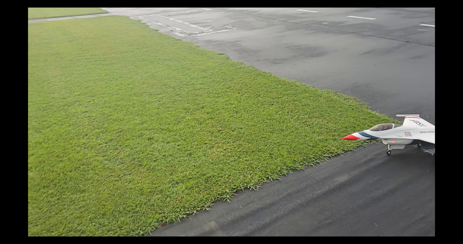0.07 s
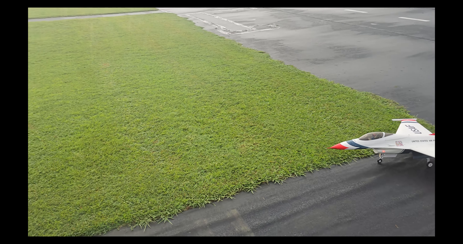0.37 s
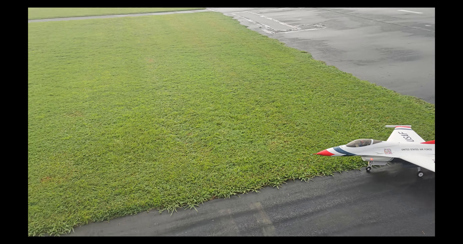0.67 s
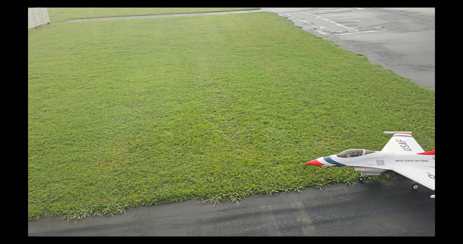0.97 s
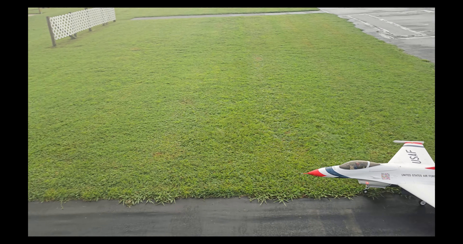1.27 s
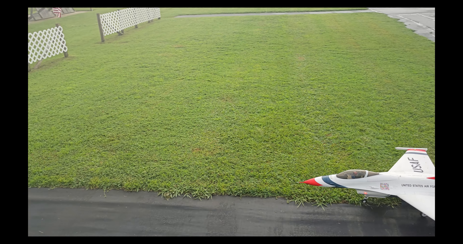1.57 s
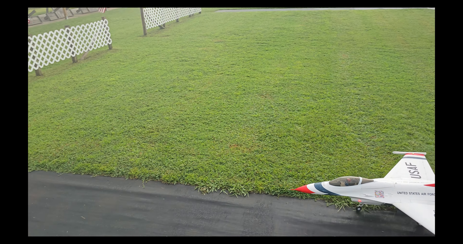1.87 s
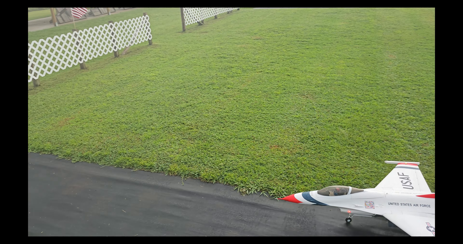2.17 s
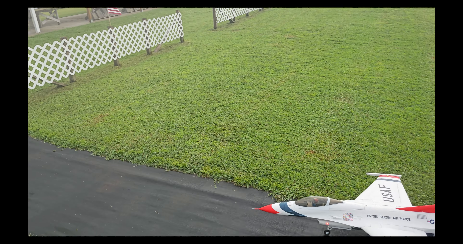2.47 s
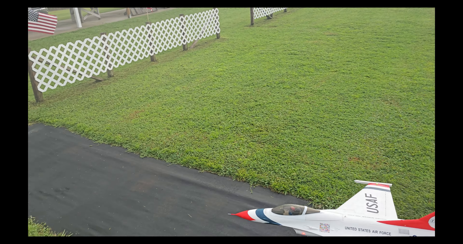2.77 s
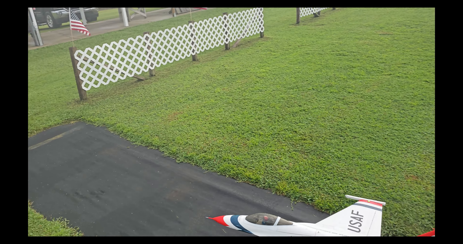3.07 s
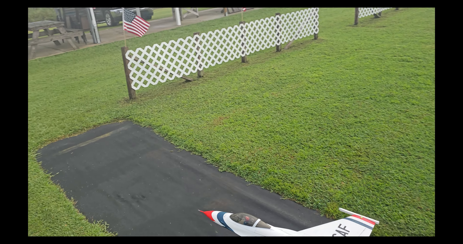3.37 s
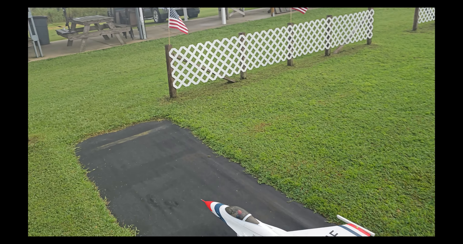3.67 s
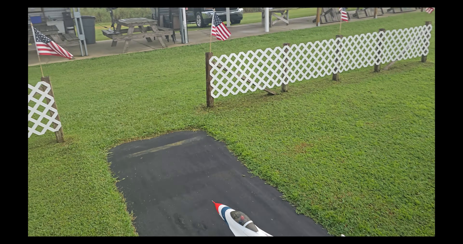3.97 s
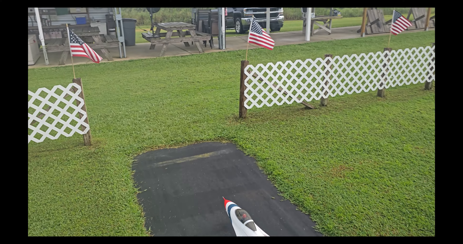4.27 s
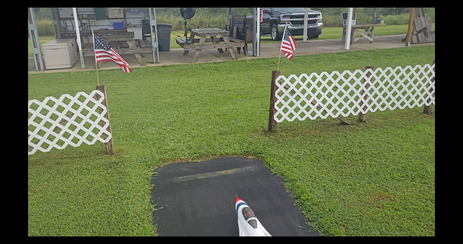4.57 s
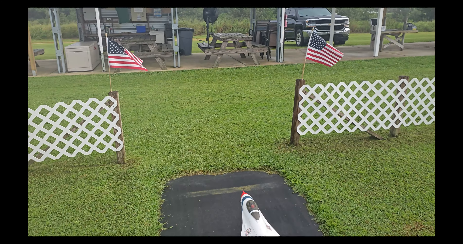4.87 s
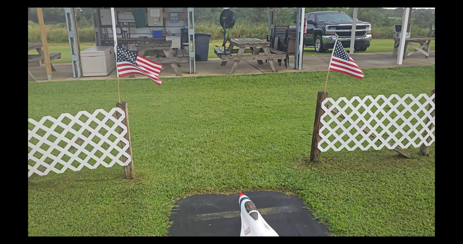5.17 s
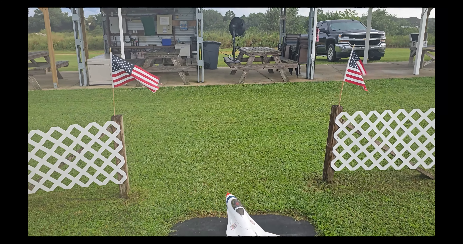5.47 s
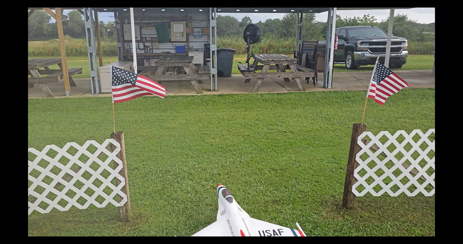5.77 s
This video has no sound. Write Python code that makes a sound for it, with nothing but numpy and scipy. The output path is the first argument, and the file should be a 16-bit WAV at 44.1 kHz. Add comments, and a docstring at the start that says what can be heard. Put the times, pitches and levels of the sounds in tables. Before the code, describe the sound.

Outdoors, over a faint rumble and even hiss, the electric fan of a model jet whines and roars, its pitch swelling and sinking with the throttle. Two quick wheel bumps come near the start, and the rushing air changes tone as the jet turns. The fan winds nearly to a stop, chirps back to life, dips again and ends with a sharp, high rev that drops off.

```python
"""Wet pavement: a model jet with a twelve-blade electric ducted fan taxis in throttle bursts.
The blades whistle through the duct, the motor sings in its housing, the turbulent exhaust roars.
The fan almost stops and restarts with a motor chirp; a thin squeal marks the last spool-up.
The rush changes colour as the jet turns tail-on, nose-on, side-on. Wheels bump over joints.
Behind it lie a low outdoor rumble and a soft, steady hiss."""
import sys
import numpy as np
from scipy import signal
from scipy.fft import rfft, irfft, next_fast_len
from scipy.io import wavfile

SR = 44100
rng = np.random.default_rng(int(sys.argv[2]) if len(sys.argv) > 2 else 0)


def transcribe(u):
    """Save the signal u as a 16-bit wav file named by the first command-line argument.

    u: samples, shape (n,) or (channels, n), limited to [-1, 1]; the rate is SR.
    q: integer samples, one column per channel.
    """
    v = np.clip(np.atleast_2d(u).T, -1, 1)
    q = np.round(v * 32767).astype(np.int16)
    wavfile.write(sys.argv[1], SR, q)


N = 256220
TIME = np.arange(N) / SR
CRUISE_HZ = 250  # shaft speed
TAIL, QUARTER, NOSE, SIDE = range(4)  # tail-on, rear quarter, nose-on, side-on

# turn of the jet: t/s, heading/(TAIL..SIDE)
HEADING = [(0, 0), (.9, 0), (1.5, 0.53), (2.0, 1.17), (2.4, 1), (3.55, 1.5), (3.9, 2), (4.9, 2), (5.3, 3),
           (5.81, 3)]
# throttle bursts: t/s, shaft speed/Hz
SHAFT = [(0.0, 266), (0.196, 231.5), (0.356, 167.7), (0.563, 211.9), (0.656, 321.7), (0.696, 339.7),
         (0.851, 332), (0.89, 312.5), (1.056, 212), (1.178, 204.8), (1.271, 224.1), (1.482, 277.3),
         (1.575, 327.8), (1.816, 378), (1.856, 377), (2.075, 287.9), (2.306, 253), (2.346, 240.3),
         (2.701, 194.4), (2.741, 194.4), (2.978, 245.2), (3.018, 248.2), (3.157, 243), (3.268, 189.6),
         (3.582, 80.4), (3.821, 47.06), (3.865, 41.5), (3.898, 98.3), (4.067, 191.8), (4.107, 221.4),
         (4.168, 233), (4.296, 237.7), (4.612, 233.9), (4.719, 225.7), (5.031, 108.5), (5.095, 103.5),
         (5.134, 154.4), (5.28, 226), (5.359, 345), (5.505, 497.3), (5.553, 486.4), (5.621, 406),
         (5.81, 200.6)]


def shaft_speed():
    """Shaft speed/Hz: rotor inertia rounds the throttle changes, turbulence jitters the pitch."""
    return glide(SHAFT) * (1 + 0.001 * wobble(45) + 0.00155 * wobble(260))


def blades(shaft_hz, shaft_rad):
    """Twelve blades whistle through the duct; uneven inflow shakes the tone and adds a noise skirt."""
    # duct response to the blade tone: f/Hz, level/dB
    duct = [(510, -42.5), (720, -30.5), (870, -47), (1220, -25.5), (1780, -19.5), (2150, -29.5),
            (2390, -24), (2550, -28.5), (2760, -20.5), (2980, -25), (3350, -22), (3750, -19.5),
            (4030, -16.8), (4250, -19), (4400, -23), (4540, -19), (5800, -13)]
    # duct response to its octave, one strong resonance: f/Hz, level/dB
    duct_octave = [(1100, -71), (3690, -45.5), (4770, -46), (4970, -37), (5230, -41), (5560, -31.5),
                   (5690, -27.5), (5900, -38), (8300, -50), (9050, -40.5), (12000, -42)]
    # blade tone envelope, apart from pitch: t/s, level/dB
    envelope = [(.06, -9), (.2, -1.5), (.49, -3), (.62, 5), (.92, 5), (.98, -3), (1.58, 1.7), (2.48, -5),
                (2.6, 1.7), (3.17, 6), (3.44, 0), (3.94, 8.5), (4.07, 1), (4.9, 1), (5.18, 1), (5.31, 9.5),
                (5.48, -5.5), (5.81, -5)]
    blade_hz, blade_rad = 12 * shaft_hz, 12 * shaft_rad
    _, _, _, beam_db, _ = directivity_db()
    tone_db = response_db(duct, blade_hz) + curves(envelope)[0]
    octave_db = response_db(duct_octave, 2 * blade_hz) + beam_db
    flutter = wobble(130) * shaft_hz / 300
    swell_db = 2.4 * duct_ripple(blade_hz, spacing_hz=55)
    whistle = amp(tone_db + swell_db + 0.58 * wobble(32) + 2.0 * flutter) * np.sin(blade_rad)
    octave_swell_db = 2.1 * duct_ripple(2 * blade_hz, spacing_hz=110.5)
    whistle += amp(octave_db + octave_swell_db + 1.2 * flutter) * np.sin(2 * blade_rad)
    # thin third harmonic, from behind at high speed
    third = np.sin(3 * blade_rad) + narrow_band(3 * blade_rad, width_hz=260)
    whistle += amp(-46) * facing(0.85) * (shaft_hz / 375) ** 9 * third
    skirt = amp(tone_db - 8.5) * narrow_band(blade_rad, width_hz=120)
    skirt += amp(octave_db - 8.5) * narrow_band(2 * blade_rad, width_hz=110)
    # slower tip eddies hum just under the tone
    _, rush_db, _ = air_levels_db(shaft_hz)
    behind = np.hypot(facing(TAIL), facing(QUARTER))
    eddy_gain = amp(rush_db - 4.5) * behind * (shaft_hz / 370) ** 4
    eddies = eddy_gain * narrow_band(11.3 * shaft_rad, width_hz=410)
    return np.sqrt(2) * whistle + skirt + eddies


def duct_ripple(hz, spacing_hz):
    """Duct modes and reflections favour some pitches: a gliding tone swells and dips."""
    knots = rng.standard_normal(512)
    return np.interp(hz / spacing_hz, np.arange(len(knots)), np.clip(knots, -2.2, .8))


def motor(shaft_hz, shaft_rad):
    """Motor tones swell through the housing resonance over a rasp; imbalance hums at shaft speed."""
    # motor tones: multiple of shaft speed, level/dB
    orders = [(4, 2.5), (5, -15), (6, -2.5), (8, 3), (16, -7), (20, -7), (24, -4), (32, -17)]
    housing_hz, housing_width_hz = 1540, 680
    song = np.zeros(N)
    for order, db in orders:
        detune = 2 * (order * shaft_hz - housing_hz) / housing_width_hz
        song += amp(db + 2.9 * wobble(30)) / (1 + detune ** 4) * np.sin(order * shaft_rad)
    rasp = amp(-7.5) * noise([(1150, -41), (1420, -3), (1620, 1), (1850, -1), (2200, -28)])
    hum_gain = amp(-30 + 1.2 * wobble(14)) * np.clip((shaft_hz - 200) / 55, 0, 1)
    hum = hum_gain * (1 - 0.64 * facing(TAIL)) * np.sin(shaft_rad)
    return amp(motor_level_db()) * (song + rasp) + hum


def motor_level_db():
    """Level follows torque (cruise = 1): air drag, as speed squared, plus spin-up."""
    spin_up_hz_per_s, min_torque, db_per_doubling = 800, 0.58, 8
    shaft_hz = glide(SHAFT)
    torque = (shaft_hz / CRUISE_HZ) ** 2 + np.gradient(shaft_hz) * SR / spin_up_hz_per_s
    *_, motor_db = directivity_db()
    return motor_db + db_per_doubling * np.log2(np.maximum(torque, min_torque))


def airflow(shaft_hz):
    """Turbulent exhaust roar, rush through the duct resonances, hiss off the blade tips."""
    # exhaust spectra, from behind and from elsewhere: f/Hz, level/dB
    roar_tail = [(60, -40), (130, -25.5), (220, -19.5), (300, -8.5), (400, -3.5), (475, 3), (560, -7.5),
                 (700, -12.5), (900, -19), (1400, -38.5)]
    roar_front = [(60, -32), (130, -17.5), (230, -4), (330, 2), (430, 0), (580, -1), (700, -7.5),
                  (900, -10.5), (1400, -21)]
    # duct rush spectra by heading: f/Hz, level/dB
    rush_tail = [(600, -23.5), (1000, -12), (1350, -11.5), (1650, -9.5), (2000, 0), (2300, -1),
                 (2700, -5.5), (3100, -8.5), (3600, 1), (4300, -2.5), (5100, -16), (5800, -12.5),
                 (7000, -27.5), (9000, -47)]
    rush_quarter = [(600, -40), (950, -11), (1250, -16), (1500, 0), (1700, 1), (1880, 8), (2100, -1),
                    (2500, -5), (3000, -11.5), (3600, -7), (4500, -13), (5250, -9.5), (6300, -20),
                    (9000, -51)]
    rush_nose = [(600, -21), (900, -12), (1200, -5), (1450, -1), (1750, -2.5), (2300, -1.5), (2800, 0),
                 (3700, 1), (4150, -12), (4600, -10), (5700, -9.5), (6300, -18.5), (7500, -24), (9000, -23)]
    rush_side = [(600, -33), (950, -6.5), (1200, 0.5), (1500, 4.5), (1900, -0.5), (2300, -6), (3200, -1),
                 (4000, -6), (4800, -8), (5600, -3), (6300, -13.5), (7500, -19), (9000, -30)]
    # blade-tip spectrum: f/Hz, level/dB
    tip_hiss = [(5000, -11), (7000, 0), (9000, -3), (10300, 3), (11300, -1), (12300, -5.5), (13600, 0),
                (14800, -15), (15600, -7)]
    roar_db, rush_db, hiss_db = air_levels_db(shaft_hz)
    tail, quarter, nose, side = map(facing, (TAIL, QUARTER, NOSE, SIDE))
    roar = np.hypot(tail, quarter) * noise(roar_tail) + np.hypot(nose, side) * noise(roar_front)
    rush = (tail * noise(rush_tail) + quarter * noise(rush_quarter)
            + nose * noise(rush_nose) + side * noise(rush_side))
    dull = filtered(rush, lambda hz: 1 / (1 + (hz / 2700) ** 4))
    rush = dull + (rush - dull) * (shaft_hz / 270) ** 0.8  # faster air is brighter
    gust = wobble(18)
    return (amp(roar_db + 0.53 * gust + 0.97 * wobble(40)) * roar
            + amp(rush_db + 0.59 * gust) * rush
            + amp(hiss_db + 0.66 * gust + 0.87 * wobble(70)) * noise(tip_hiss))


def air_levels_db(shaft_hz):
    """Roar, rush and hiss each grow by their own power of the flow."""
    # airflow envelope, apart from speed and heading: t/s, roar and rush/dB, hiss/dB
    envelope = [(0, 1, 5), (.2, 2.3, 4), (.48, -1.5, -4), (.65, 1, 6), (.95, -1, 6.5), (1.2, -0.9, 1.5),
                (1.6, -1.5, -0.5), (2.1, -1.5, -2.5), (2.62, 1.5, -1), (3.05, 0.7, -0.3),
                (3.45, -0.5, -3.5), (3.79, -2.2, 5), (3.85, -6.5, -6), (3.94, 1.3, -3), (4.75, 3.16, 5),
                (5.02, 1, 1), (5.12, 4.8, 5), (5.32, 5, 6), (5.5, -8, -10), (5.81, -3, -4)]
    draught_hz = 102  # flow floor, as a shaft speed
    doublings = np.log2(np.hypot(shaft_hz, draught_hz) / np.hypot(CRUISE_HZ, draught_hz))
    roar_db, rush_db, hiss_db, _, _ = directivity_db()
    body_db, treble_db = curves(envelope)
    return (roar_db + 12.5 * doublings + body_db,
            rush_db + 13 * doublings + body_db,
            hiss_db + 21.5 * doublings + treble_db)


def directivity_db():
    """Level of each layer as the jet turns."""
    # radiation at cruise, rows TAIL..SIDE: roar/dB, rush/dB, hiss/dB, whistle octave/dB, motor/dB
    radiation = [(-20.5, -23.5, -54, 0, -38.5), (-21, -21, -46, -3.5, -37), (-24, -18, -38.2, 6, -25),
                 (-29, -21, -41.5, -0.5, -41.5)]
    heading, = curves(HEADING)
    return [np.interp(heading, np.arange(len(db)), db) for db in np.transpose(radiation)]


def facing(view):
    """Equal-power crossfade gain for one side of the jet."""
    return np.sqrt(np.clip(1 - abs(curves(HEADING)[0] - view), 0, 1))


def controller_squeal():
    """The speed controller squeals thinly at the start of the last spool-up."""
    # squeal envelope: t/s, level/dB
    envelope = [(5.08, -90), (5.115, -46), (5.2, -42), (5.25, -43), (5.3, -90)]
    return amp(curves(envelope)[0]) * narrow_band(2 * np.pi * 12500 * TIME, width_hz=330)


def wheels():
    """Each pavement joint thuds through the foam airframe."""
    # wheel bumps: t/s, level/dB
    bumps = [(.155, -40), (1.166, -14), (1.322, -12.5), (2.3, -29)]
    # airframe modes: f/Hz, level/dB, t60/s
    modes = [(220, -5.5, 0.12), (266, 1, 0.077), (366, -8, 0.066), (644, -7, 0.051), (880.6, -8, .05)]
    attack_s = 0.0045
    out = np.zeros(N + SR)
    t = TIME[:SR // 4]
    for start_s, bump_db in bumps:
        thud = sum(amp(db + rng.normal(0, 1.4) - 60 * t / t60_s) * np.sin(2 * np.pi * hz * t)
                   for hz, db, t60_s in modes)
        out[round(start_s * SR):][:len(t)] += amp(bump_db) * thud * (1 - np.exp(-t / attack_s))
    return out[:N]


def echoes(x, wet_db, t60_s):
    """Early echoes beat against the gliding tones; a short diffuse tail follows."""
    # reflections off ground, posts and wall: delay/s, level/dB
    reflections = [(.0013, -35), (.0047, -19), (.0093, -18.5), (0.016, -19), (0.0232, -27.5)]
    t = TIME[:SR // 3]
    tail = unit(rng.standard_normal(len(t)) * amp(-60 * t / t60_s))
    response = amp(wet_db) * tail / np.sqrt(len(t))
    response[0] = 1
    for delay_s, db in reflections:
        response[round(delay_s * SR)] += amp(db)
    return signal.fftconvolve(x, response / np.linalg.norm(response))[:N]


def ground_bounce(x, lag_s, bounce_db):
    """A reflection whose path drifts as the jet rolls: a slowly moving comb."""
    delay_s = lag_s * (1 + 0.066 * wobble(1.13))
    echo = np.interp(TIME - delay_s, TIME, x)
    return (x + amp(bounce_db) * echo) / np.hypot(1, amp(bounce_db))


def outdoor_background():
    """Low rumble and soft, steady hiss."""
    # background spectrum: f/Hz, level/dB
    spectrum = [(25, -24), (50, -14), (90, 0), (140, -2), (300, -1), (1000, -15.5), (3000, -7),
                (6000, -17.5), (9000, -50), (15000, -53)]
    return amp(-40.5 + .8 * wobble(3.7)) * noise(spectrum)


def amp(db):
    """dB to gain."""
    return 10 ** (np.asarray(db) / 20)


def unit(x):
    """Scale to rms 1."""
    return x / np.sqrt(np.mean(x ** 2) + 1e-20)


def curves(rows):
    """One per-sample curve for each column after t/s."""
    times_s, *columns = np.transpose(rows)
    return [np.interp(TIME, times_s, column) for column in columns]


def glide(rows):
    """Per-sample cubic through (t/s, value) points."""
    times_s, value = np.transpose(rows)
    slope, step_s = np.gradient(value, times_s), np.diff(times_s)
    i = np.clip(np.searchsorted(times_s, TIME) - 1, 0, len(step_s) - 1)
    u = np.clip((TIME - times_s[i]) / step_s[i], 0, 1)
    ease = u * u * (3 - 2 * u)
    bend = step_s[i] * u * (1 - u) * (slope[i] * (1 - u) - slope[i + 1] * u)
    return value[i] + np.diff(value)[i] * ease + bend


def response_db(points, hz):
    """Read (f/Hz, level/dB) points on a log frequency axis."""
    points_hz, db = np.transpose(points)
    return np.interp(np.log(hz), np.log(points_hz), db)


def wobble(knots_per_s):
    """Smooth random curve."""
    knots = rng.standard_normal(int(N * knots_per_s / SR) + 4)
    smooth = signal.resample_poly(knots, 8, 1)
    return np.interp(TIME * knots_per_s, np.linspace(0, len(knots), len(smooth), endpoint=False), smooth)


def filtered(x, response):
    """Apply the gain response(f/Hz) by FFT."""
    size = next_fast_len(N + 8192)
    return irfft(rfft(x, size) * response(np.fft.rfftfreq(size, 1 / SR)), size)[:N]


def noise(spectrum):
    """Noise of rms 1, shaped by (f/Hz, level/dB) points."""
    points_hz, db = np.transpose(spectrum)
    hz = np.fft.rfftfreq(next_fast_len(N, real=True), 1 / SR)
    gain = amp(np.interp(np.log(hz + 1), np.log(points_hz), db, -120, -120))
    white = rng.standard_normal(len(hz)) + 1j * rng.standard_normal(len(hz))
    return unit(irfft(gain * white)[:N])


def narrow_band(phase_rad, width_hz):
    """Noise of rms 1 around a moving tone."""
    pole = np.exp(-2 * np.pi * width_hz / SR)
    in_phase, quadrature = signal.lfilter([1], np.poly([pole, pole]), rng.standard_normal((2, N)))
    return unit(in_phase * np.cos(phase_rad) + quadrature * np.sin(phase_rad))


def scene():
    """The taxiing jet and its reflections over the outdoor background, mono."""
    shaft_hz = shaft_speed()
    shaft_rad = 2 * np.pi * np.cumsum(shaft_hz) / SR
    tones = echoes(blades(shaft_hz, shaft_rad) + motor(shaft_hz, shaft_rad), wet_db=-14.5, t60_s=0.29)
    air = ground_bounce(airflow(shaft_hz), lag_s=0.00218, bounce_db=-23.5)
    background = outdoor_background()
    return (tones + air + controller_squeal() + wheels() + background)[None]


def record(dry):
    """Microphone: narrow treble notch, clipped peaks, steep band edge."""
    notch_hz, half_width_hz, top_hz = 8270, 260, 15650
    notched = filtered(dry[0], lambda hz: 1 - 0.96 / (1 + ((hz - notch_hz) / half_width_hz) ** 2))
    return filtered(np.clip(notched, -1, 1), lambda hz: hz < top_hz)[None]


dry = scene()
out = record(dry)
transcribe(out)
```